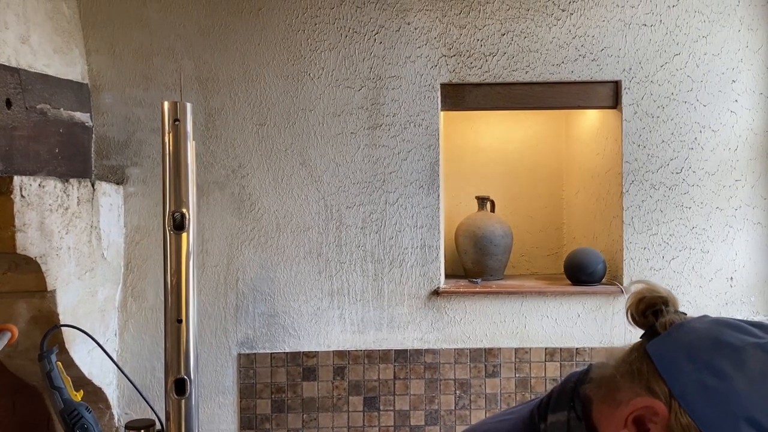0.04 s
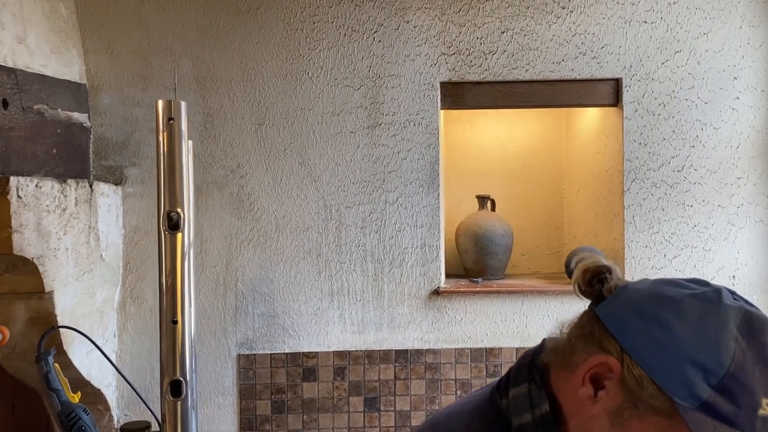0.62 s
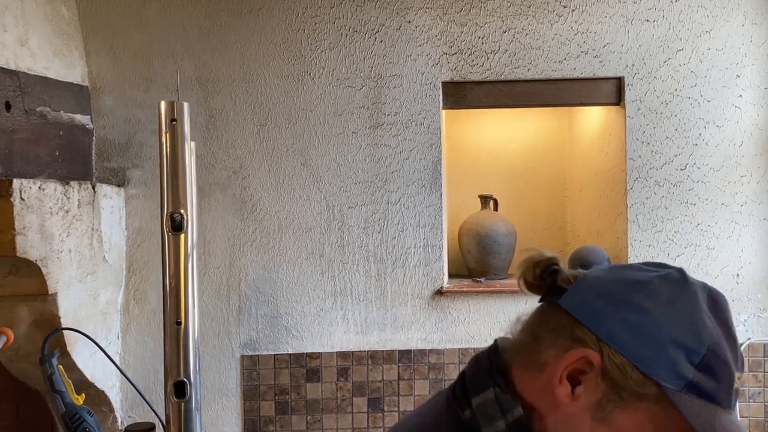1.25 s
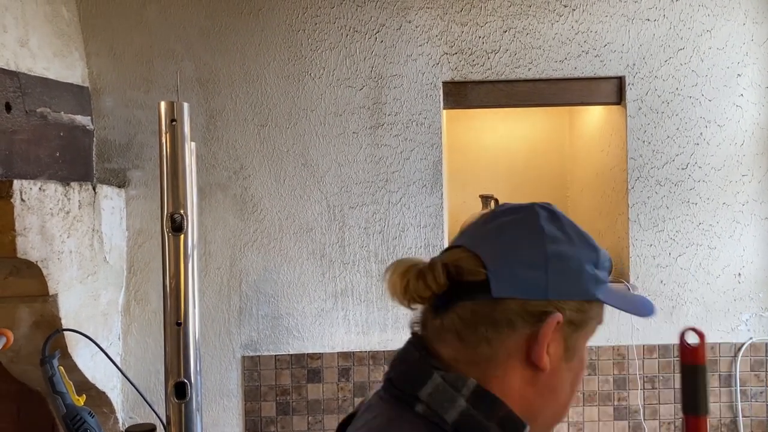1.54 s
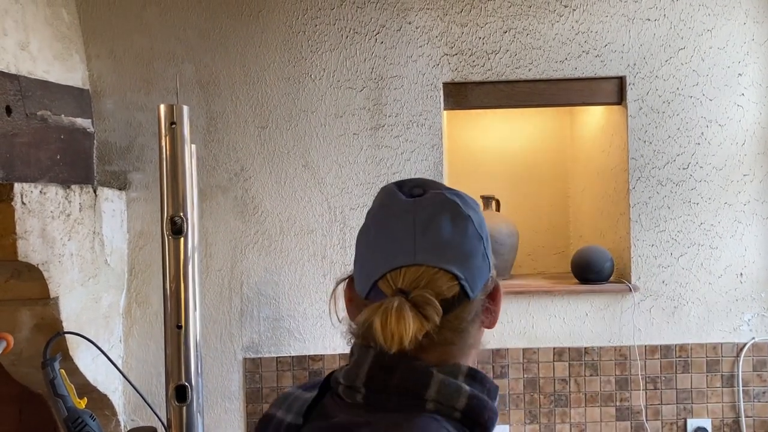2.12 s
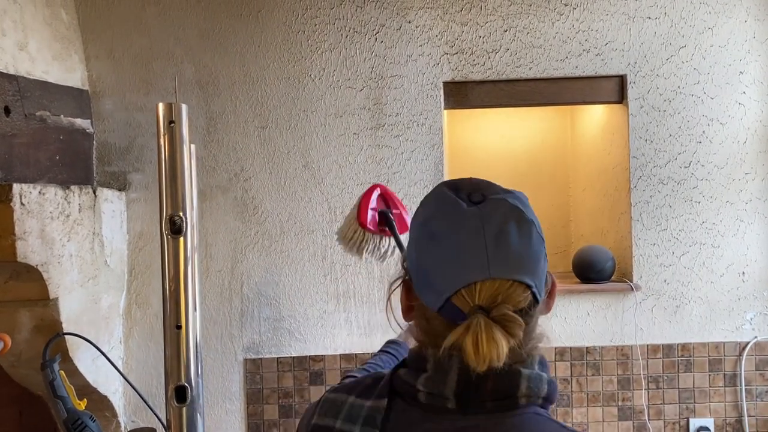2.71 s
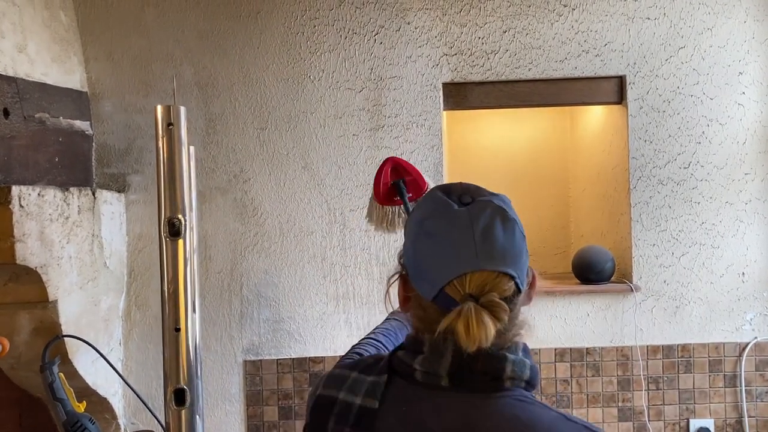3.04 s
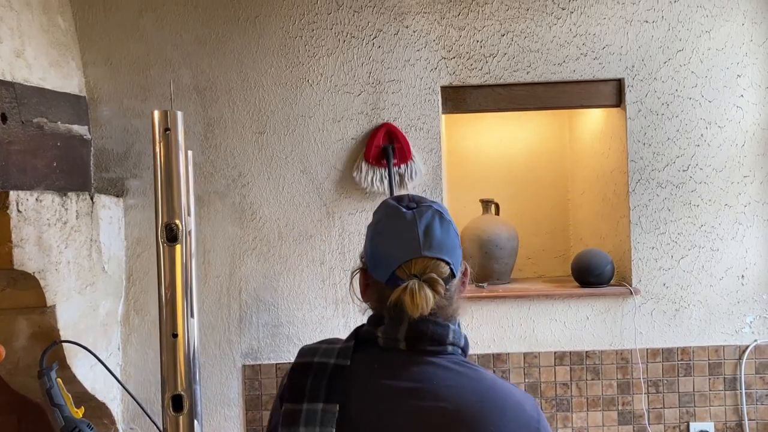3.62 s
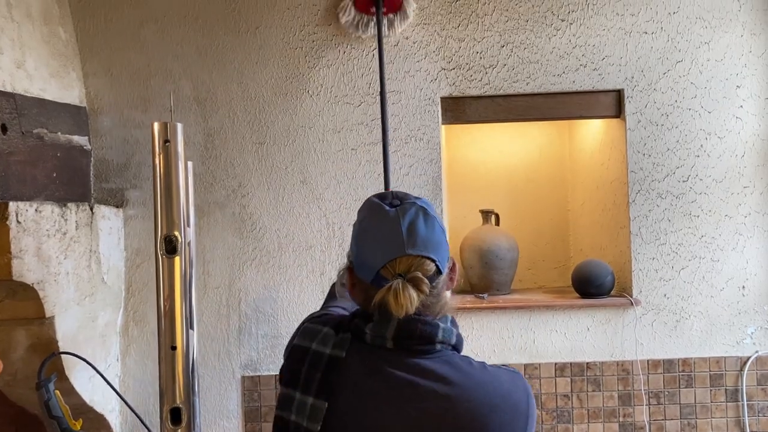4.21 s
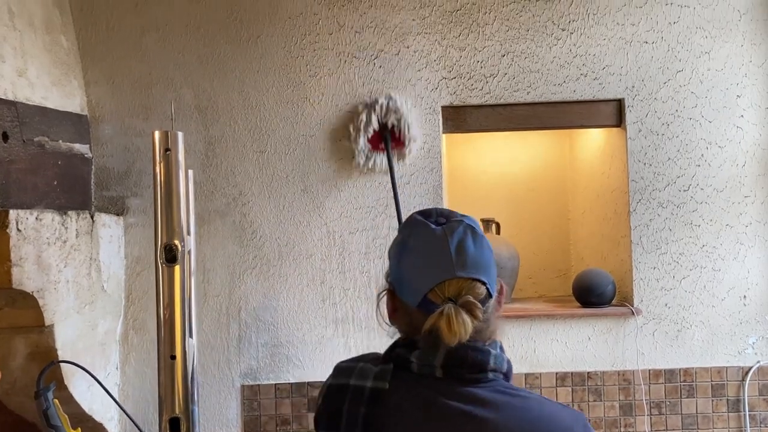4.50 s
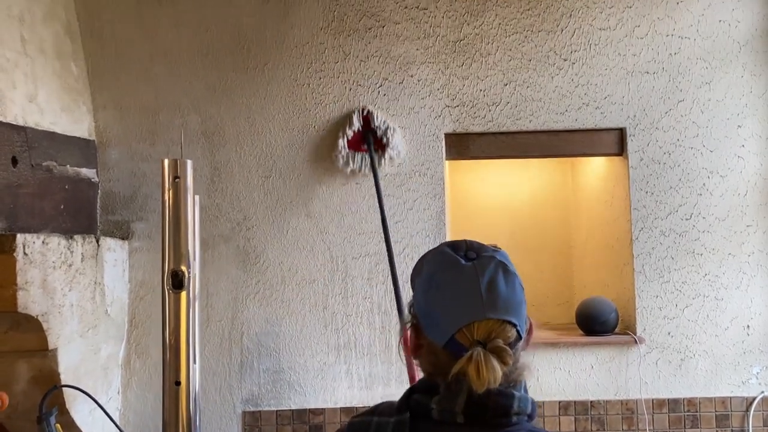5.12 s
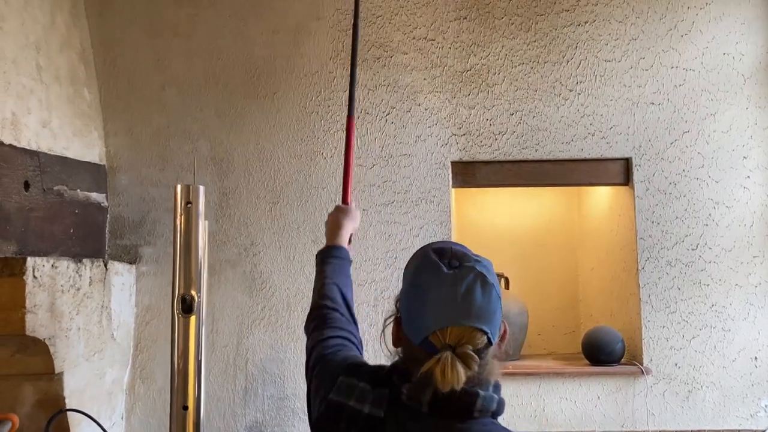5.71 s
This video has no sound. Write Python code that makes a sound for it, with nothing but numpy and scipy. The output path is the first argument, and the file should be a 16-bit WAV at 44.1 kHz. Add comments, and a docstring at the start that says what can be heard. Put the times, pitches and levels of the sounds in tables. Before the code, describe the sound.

Water sloshes and a plastic bucket clacks loudly before wet mop strands slap, rasp and hiss over plaster indoors.

```python
"""Mopping a wall in a hard-walled room, heard on a two-port stereo microphone with plenty of echo.
First a wet string mop is wrung out in a plastic bucket: water sloshes and spatters, plastic chafes,
and the head knocks in the wringer, once hard enough to overload the microphone. From 1.5 s the mop is
lifted, its socket and handle tapping. At 2.35 s the wet strands slap onto rough plaster, then scrub
up and down to the end: the grit rasps, the water film hisses and the head judders under pressure."""
import sys
import numpy as np
from scipy import signal
from scipy.fft import rfft, irfft
from scipy.io import wavfile

SR = 44100
rng = np.random.default_rng(int(sys.argv[2]) if len(sys.argv) > 2 else 0)


def dump_mix(stems):
    """Bounce the given channels to the path in sys.argv[1] as a 16-bit WAV at rate SR."""
    frames = np.atleast_2d(stems).T  # one column per channel
    limited = np.clip(frames, -1, 1)  # hard clip at full scale
    pcm = np.round(limited * 32767).astype(np.int16)
    wavfile.write(sys.argv[1], SR, pcm)


N = 253575
NOW = np.arange(N) / SR
AGE = NOW[:SR]  # one second, for single hits

# decay of the room: freq_hz, t60_s
ROOM_DECAY = [(80, 0.73), (350, 0.78), (1200, 0.74), (2500, 0.57), (5000, 0.58), (9000, 0.28),
              (16000, 0.52)]
# balance of the microphone's two ports: freq_hz, left_minus_right_db
PORT_BALANCE = [(100, 0), (500, -0.5), (1100, -2), (2000, -1), (4000, 4.5), (7000, 0.5), (11000, 0.5)]
# spectrum of each noise: freq_hz, density_db
ROOM_TONE_COLOUR = [(20, -15), (60, 0), (150, -4), (400, -7.5), (1500, -5.5), (5000, -14), (16000, -24)]
SLOSH_COLOUR = [(40, -38), (100, -21), (170, -17.5), (240, -13), (290, -9.5), (370, -2.5), (600, -3),
                (740, -9.5), (1000, -13.5), (1500, -15), (3000, -27.5), (8000, -52)]
SPRAY_COLOUR = [(200, -21), (800, 10), (2000, 5.5), (4500, 1), (7000, -2), (10000, -3.5), (15500, -12)]
CHAFE_COLOUR = [(200, -40), (550, -17.5), (740, -21.5), (950, -2), (1300, -8), (2000, -8), (3000, -19),
                (4000, -21), (5000, -22), (6500, -38), (15000, -53)]
TICK_COLOUR = [(400, -39), (900, -41.5), (1600, -8), (2400, -1), (3100, -0.5), (4000, -3.5), (4900, -4),
               (6000, -10), (9000, -10), (16000, -29)]
SLAP_COLOUR = [(60, -44.5), (200, -11), (400, -0.5), (800, -1), (2200, 1), (4000, -3), (6000, -4.5),
               (9000, -1.5), (12000, -11), (16000, -17)]
RASP_COLOUR = [(60, -33), (150, -12), (400, -8.5), (900, 1), (1500, 3.5), (2500, 1), (4500, -7.5),
               (8000, -14.5), (16000, -40)]
HISS_COLOUR = [(1000, -25), (2300, -8.5), (3000, 2), (4800, 0.5), (6200, 0.5), (8200, -0.5), (11000, -4.5),
               (15500, -13.5)]
JUDDER_COLOUR = [(50, -30), (130, -4), (230, -10), (400, 5), (490, 0), (620, 4.5), (850, 3.5), (1150, -3.5),
                 (2500, -24.5), (6000, -51)]
# modes of the bucket: pitch_hz, level_db, t60_s
BUCKET_MODES = [(249, -14.5, 1), (346, -1, 0.59), (414, 4.5, 0.57), (459, -3, .35), (526, -9, 0.62),
                (586, -11, 0.2), (624, -5.5, 0.47), (952.5, 0, 0.2), (995, -8.5, 0.23), (1170, -10.5, 0.29),
                (1225, -25.5, 0.27), (1214, -8.5, 0.36), (1540, -22, .35), (1600, -14, 0.23)]
# modes of the wall with the mop pressed on it: pitch_hz, level_db, t60_s
WALL_MODES = [(56, -1, .28), (91.4, -5.5, 0.35), (133, 5, 0.14), (199.6, -5, 0.21), (229.8, 2, 0.17),
              (266, -2, 0.13), (332, -15.5, 0.089), (497.5, -3, 0.23), (620, 2, .12)]
# water gushing from the mop into the bucket: start_s, swell_s, level_db
GUSHES = [(0, 0.0041, -43), (.09, 0.023, -32), (.16, 0.092, -26.5), (.26, 0.17, -21.5), (.615, .04, -19),
          (1.16, 0.011, -36), (1.225, 0.017, -31), (1.59, 0.028, -42.5), (1.72, .03, -45),
          (1.98, .014, -51)]
# squeezes that spray water from the strands: start_s, length_s, swell_s, release_s, level_db
SQUEEZES = [(0.063, 0.14, 0.027, 0.027, -59), (0.176, 0.31, 0.054, 0.2, -35.5),
            (0.928, 0.25, 0.069, 0.03, -46.5)]
# plastic sticking and slipping: start_s, level_db, length_s, squeak_hz, squeak_relative_db
CHAFES = [(0.411, -21.5, 0.041, 2420, -9), (0.623, -17.5, 0.037, 1230, -2),
          (0.631, -17.5, 0.052, 2380, -4.5), (0.681, -19.5, 0.086, 4934, -13),
          (0.704, -8.5, 0.015, 2620, -2.5), (2.172, -42, 0.061, 3170, -5),
          (2.211, -41.5, 0.054, 4720, -3.5), (4.169, -47.5, 0.055, 2800, 5)]
# the mop head knocking in the bucket: start_s, clack_db, clack_hz, boom_db, boom_hz, ring_db
KNOCKS = [(0.4376, 1.5, 1197, -1.5, 598, -23.5), (.667, -29.5, 1067, -7.5, 582, -33),
          (0.7065, -1, 1495, 5.5, 452, -24), (.719, 1, 1245, -3, 430, -33),
          (.777, -18, 1200, -14, 348, -30.5), (1.002, -26, 880, -17.5, 303, -50.5),
          (1.175, -28, 1580, -18, 415, -43), (1.2244, -4, 1375, -8, 455, -32.5),
          (1.235, -6, 970, -13.5, 412, -33)]
# hard taps of the plastic socket and handle: start_s, level_db, pitch_hz, t60_s, tick_db
SOCKET_TAPS = [(2.051, -31, 1670, 0.016, -44), (2.181, -26, 1556, 0.034, -24), (2.187, -21, 3120, .02, -30),
               (2.213, -28, 890, 0.042, -23), (2.216, -36, 4780, 0.15, -41),
               (2.628, -15, 1123, 0.099, -31.5), (2.743, -24.5, 1520, 0.026, -34),
               (3.361, -23, 2040, 0.049, -14.5), (4.795, -32, 1014, 0.037, -56),
               (5.116, -31, 514, 0.058, -41), (5.220, -25.5, 707, 0.04, -34), (5.508, -27, 650, 0.03, -48),
               (5.543, -26.5, 694, 0.037, -39)]
# the head thudding through floor and wall: start_s, level_db, swell_s, soft_above_hz, stiff_below_hz
THUDS = [(0.707, -32.5, 0.0012, 100, 45), (2.359, -29, 0.0107, 500, 238), (2.856, -18.5, 0.0096, 604, 134),
         (2.896, -26.5, 0.011, 120, 40), (3.368, -40, 0.012, 311, 99.4), (4.790, -29.5, 0.004, 400, 280),
         (5.219, -35, 0.031, 201, 80), (5.41, -37, .015, 162, 80)]
# wet strands landing in a swarm: start_s, level_db, swell_s, fade_s, dull_above_hz
SLAPS = [(2.352, -25, 0.0073, 0.029, 1500), (2.360, -25.5, 0.026, 0.022, 5840),
         (2.854, -26.5, 0.0064, 0.078, 890), (3.300, -27, 0.03, 0.046, 9130),
         (3.36, -19.5, 0.032, 0.027, 9160)]
# strokes through the air and over the plaster: start_s, length_s, swell_s, rasp_db, hiss_db
STROKES = [(1.462, 0.21, 0.054, -45, -52.5), (1.657, 0.29, 0.16, -54, -55),
           (1.977, 0.19, 0.017, -44, -50.5), (2.114, 0.083, 0.058, -38, -44),
           (2.558, 0.099, 0.022, -38.5, -53), (2.688, 0.052, 0.044, -33, -46),
           (2.754, .28, 0.036, -46, -48.5), (3.102, .5, .1, -54.5, -64.5), (3.598, 0.34, .14, -46, -48),
           (3.91, 0.16, 0.07, -54, -40), (4.151, 0.038, 0.038, -50.5, -45),
           (4.344, 0.42, 0.069, -53.5, -56), (4.626, 0.13, 0.082, -48, -44),
           (4.817, 0.032, 0.019, -51, -42), (4.883, 0.92, 0.24, -43, -49)]
# hard pushes along the wall that make the head judder: start_s, length_s, swell_s, level_db
PUSHES = [(2.71, 0.18, 0.054, -44), (3.6, 0.27, .1, -63.5), (4.66, 0.5, 0.32, -49),
          (4.972, 0.72, .22, -39.5)]


def amp(db):
    """Decibels to gain."""
    return 10 ** (np.asarray(db) / 20)


def unit(x):
    """Scales to an rms of one."""
    return x / np.sqrt(np.mean(x ** 2) + 1e-20)


def curve_at(points, hz):
    """Interpolates a table on a log-frequency axis."""
    freqs, values = np.transpose(points)
    return np.interp(np.log(hz + 1), np.log(freqs), values)


def add(mix, start_s, sound):
    """Mixes a sound in at its start time."""
    part = mix[round(start_s * SR):][:len(sound)]
    part += sound[:len(part)]


def tint(x, colour, size=4096):
    """Minimum-phase filter with the given colour and unit energy."""
    log_gain = np.log(amp(curve_at(colour, abs(np.fft.fftfreq(size, 1 / SR)))))
    response = np.exp(np.conj(signal.hilbert(log_gain)))
    taps = np.fft.ifft(response).real[:size // 2]
    return signal.oaconvolve(x, taps / np.linalg.norm(taps))[:len(x)]


def grains(per_s, spread_db, size=N):
    """Random tiny impacts of uneven strength."""
    height = amp(spread_db * np.minimum(rng.exponential(1, size), 4))
    return unit(height * rng.standard_normal(size) * (rng.random(size) < per_s / SR))


def clumps(depth_db, per_s):
    """Uneven catching and letting go, as a gain."""
    knots = unit(rng.standard_normal(4096))
    return amp(depth_db * np.interp(NOW * per_s, np.arange(len(knots)), knots))


def envelope(start_s, length_s, swell_s, release_s, ease_db_per_s=0):
    """Swells, holds or eases off, and dies away once its length is over."""
    age = np.maximum(NOW - start_s, 0)
    held = amp(-ease_db_per_s * np.maximum(age - swell_s, 0))
    return np.minimum(age / swell_s, 1) * held * np.exp(-np.maximum(age - length_s, 0) / release_s)


def together(gains):
    """Overlapping noisy movements add in power."""
    return np.sqrt(sum(gain ** 2 for gain in gains))


def ring(hz, t60_s):
    """One dying mode."""
    return np.sin(2 * np.pi * hz * AGE) * np.exp(-np.log(1000) * AGE / t60_s)


def blow(hz, swell_s):
    """A heavily damped ring whose envelope swells to one."""
    return np.sin(2 * np.pi * hz * AGE) * AGE / swell_s * np.exp(1 - AGE / swell_s)


def room_tone(level_db=-55):
    """The faint, steady noise of the place, partly common to both ports."""
    air = np.array([tint(rng.standard_normal(N), ROOM_TONE_COLOUR) for _ in range(2)])
    return amp(level_db) * (air + .5 * air[::-1])


def room_tail(slot=SR // 2000):
    """Sparse reflections of random sign reach each port, every band dying at its own speed."""
    echoes = np.zeros((2, SR))
    slots = np.arange(SR // 300, SR - slot, slot)
    arrivals = slots + rng.integers(0, slot, (2, len(slots)))
    np.put_along_axis(echoes, arrivals, rng.choice([-1., 1.], arrivals.shape), 1)
    echoes *= 1 + 2.43 * np.exp(-AGE / 0.0099)  # near walls answer first and loudest
    hz, t, bands = signal.stft(echoes, SR, nperseg=256)
    alike = 1 / (1 + (hz[:, None] / 300) ** 2)  # long waves reach both ports alike
    bands[1] = alike * bands[0] + np.sqrt(1 - alike ** 2) * bands[1]
    decay = np.exp(-np.log(1000) * t / curve_at(ROOM_DECAY, hz)[:, None])
    tail = signal.istft(bands * decay, SR)[1]
    return tail / np.linalg.norm(tail[0])


def room_echoes(x, moves_per_s, patterns=5):
    """As the mop and its strands move, one pattern of echoes gives way to the next."""
    out = np.zeros((2, N))
    for k in range(patterns):
        away = abs((moves_per_s * NOW - k + patterns / 2) % patterns - patterns / 2)
        share = np.cos(np.pi / 2 * np.minimum(away, 1))
        out += signal.fftconvolve((x * share)[None], room_tail(), axes=1)[:, :N]
    return out


def wall_thuds():
    """The padded mop head leans into the wall's low modes; a softer blow leaves out the higher ones."""
    out = np.zeros(N)
    for start, db, swell, soft_hz, stiff_hz in THUDS:
        onset = 1 - np.exp(-AGE / swell)
        for hz, mode_db, t60 in WALL_MODES:
            reach = 1 / (1 + (hz / soft_hz) ** 2) / (1 + (stiff_hz / hz) ** 4)
            late = swell * rng.random()  # the strands do not all land at once
            add(out, start + late, amp(db + mode_db) * reach * ring(hz, t60) * onset)
    return out


def socket_taps():
    """The socket rings briefly on a cluster of close modes, with a bright rattle of the handle joint."""
    out = np.zeros(N)
    for start, db, hz, t60, tick_db in SOCKET_TAPS:
        cluster = ring(hz, t60) + .35 * (ring(hz * .9, t60) + ring(hz * 1.11, t60))
        rattle = tint(rng.standard_normal(SR) * np.exp(-AGE / 0.0049), TICK_COLOUR)
        add(out, start, amp(db) * cluster + amp(tick_db) * rattle)
    low_cut = signal.butter(2, 500, "high", fs=SR, output="sos")  # a small part radiates no bass
    return signal.sosfilt(low_cut, out)


def plastic_chafes():
    """Quick uneven slips shake the plastic and half squeak."""
    out = np.zeros(N)
    for start, db, length, squeak_hz, squeak_db in CHAFES:
        slips = grains(per_s=5000, spread_db=.8, size=SR)
        squeak = unit(signal.oaconvolve(slips, ring(squeak_hz, t60_s=.004))[:SR])
        grip = np.clip(np.minimum(AGE, length - AGE) / 0.0071, 0, 1)
        add(out, start, amp(db) * grip * (tint(slips, CHAFE_COLOUR) + amp(squeak_db) * squeak))
    return out


def bucket_ring():
    """The bucket's modes, each starting up to 10 ms late as the wave runs round its wall."""
    return sum(amp(db) * np.pad(ring(hz, t60), (rng.integers(SR // 100), 0))[:SR]
               for hz, db, t60 in BUCKET_MODES)


def bucket_slosh(settle_s=0.13):
    """Water pressed out of the mop churns in the ringing bucket and settles after each gush."""
    flow = together(amp(db) * envelope(start, swell, swell, settle_s) for start, swell, db in GUSHES)
    churn = grains(per_s=1800, spread_db=1.9) * flow
    body = bucket_ring()
    ringing = signal.oaconvolve(churn, body / np.linalg.norm(body))[:N]
    return tint(churn, SLOSH_COLOUR) + amp(-10.5) * ringing


def wringer_spray():
    """Each squeeze spatters fine drops from the strands."""
    squeeze = together(amp(db) * envelope(*timing) for *timing, db in SQUEEZES)
    drops = tint(grains(per_s=9000, spread_db=-1.0), SPRAY_COLOUR)
    return drops * squeeze * clumps(depth_db=2.5, per_s=100)


def bucket_knocks():
    """A clack of plastic on plastic, then the boom of the bucket's bottom and the ring of its wall."""
    out = np.zeros(N)
    for start, clack_db, clack_hz, boom_db, boom_hz, ring_db in KNOCKS:
        add(out, start, amp(clack_db) * blow(clack_hz, swell_s=.0012))
        add(out, start + 0.00312, amp(boom_db) * blow(boom_hz, swell_s=0.0022))
        add(out, start, amp(ring_db) * bucket_ring())
    return out


def mop_slaps():
    """Hundreds of wet strands land on the wall in a swarm that swells and fades."""
    out = np.zeros(N)
    for start, db, swell, fade, dull_hz in SLAPS:
        swarm = np.minimum(AGE / swell, 1) * np.exp(-np.maximum(AGE - swell, 0) / fade)
        landings = tint(grains(per_s=6000, spread_db=1.0, size=SR), SLAP_COLOUR)
        pole = np.exp(-2 * np.pi * dull_hz / SR)
        splat = signal.lfilter([1 - pole], [1, -pole], landings)
        add(out, start, amp(db) * swarm * unit(splat))
    return out


def mop_scrub(strand_stop_s=0.028, judder_stop_s=0.14, arm_ease_db_per_s=10.5):
    """Strands catch on plaster grit, the water film fizzes, and under pressure the head judders."""
    grit = grains(per_s=3000, spread_db=3.0) * clumps(depth_db=3.0, per_s=120)
    film = grains(per_s=14000, spread_db=2.5) * clumps(depth_db=3.0, per_s=70)
    jolts = grains(per_s=900, spread_db=1.5) * clumps(depth_db=4.0, per_s=35)
    moves = [(envelope(*timing, strand_stop_s, arm_ease_db_per_s), rasp_db, hiss_db)
             for *timing, rasp_db, hiss_db in STROKES]
    pressure = together(amp(db) * envelope(*timing, judder_stop_s, arm_ease_db_per_s)
                        for *timing, db in PUSHES)
    rasp = tint(grit, RASP_COLOUR) * together(speed * amp(db) for speed, db, _ in moves)
    hiss = tint(film, HISS_COLOUR) * together(speed * amp(db) for speed, _, db in moves)
    judder = tint(jolts, JUDDER_COLOUR) * pressure
    return rasp + amp(3.5) * hiss + judder


def scene():
    """Bucket and wall share one room, far enough off that the echo rivals the direct sound."""
    wringing = amp(3.5) * bucket_slosh() + amp(9.0) * wringer_spray() + plastic_chafes()
    sources = [wringing, bucket_knocks(), socket_taps() + wall_thuds(), mop_slaps() + mop_scrub()]
    echo_db = [3, -1.5, -0.5, 3.5]  # room against direct sound, for each source
    direct = [x / np.hypot(1, amp(db)) for x, db in zip(sources, echo_db)]
    into_room = sum(x * amp(db) for x, db in zip(direct, echo_db))
    return sum(direct) + room_echoes(into_room, moves_per_s=22) + room_tone()


def share_treble(spectra, hz, from_hz=7000, fade_hz=900, lag_s=.000235):
    """In the top octave both channels carry nearly the same sound, the right a little ahead."""
    above_hz = np.maximum(hz - from_hz, 0)
    alike = np.minimum(above_hz / fade_hz, 1)
    left, right = spectra
    blend = alike * left + (1 - alike) * right
    return np.array([left, blend * np.exp(2j * np.pi * above_hz * lag_s)])


def record(dry, low_cut_hz=45, band_limit_hz=15900):
    """Each microphone port has its own colour and cuts rumble; the loudest knock clips; a band limit."""
    hz = np.fft.rfftfreq(N, 1 / SR)
    lean_db = curve_at(PORT_BALANCE, hz) / 2
    heard = irfft(share_treble(rfft(dry), hz) * amp([lean_db, -lean_db]), N)
    heard = signal.sosfilt(signal.butter(2, low_cut_hz, "high", fs=SR, output="sos"), heard)
    clipped = np.clip(heard, -1, 1)
    band_limit = signal.firwin(511, band_limit_hz, window=("kaiser", 9), fs=SR)
    return signal.oaconvolve(clipped, band_limit[None], "same")


dry = scene()
out = record(dry)
dump_mix(out)
```